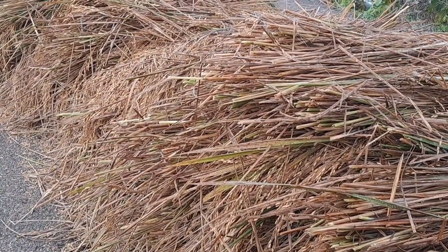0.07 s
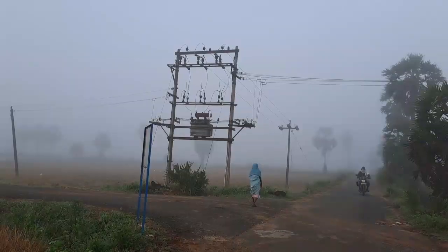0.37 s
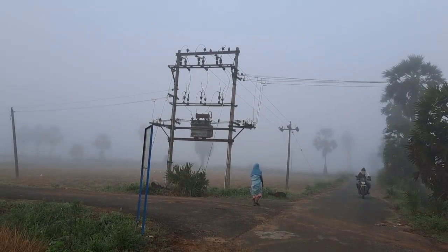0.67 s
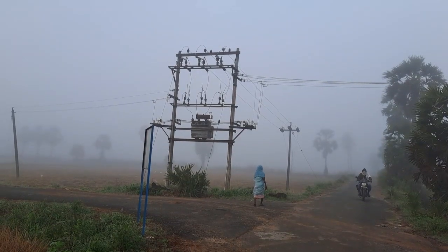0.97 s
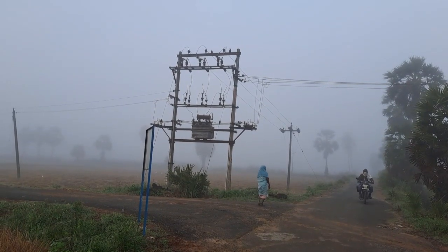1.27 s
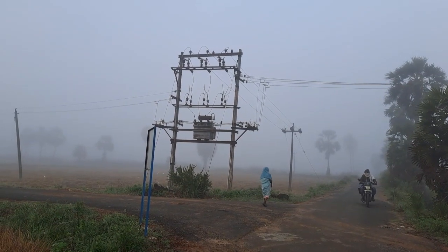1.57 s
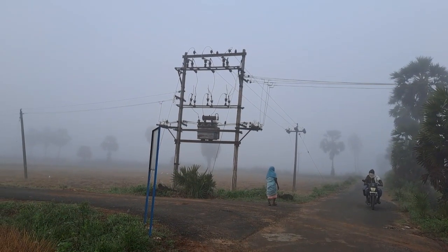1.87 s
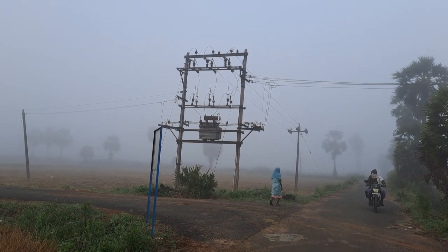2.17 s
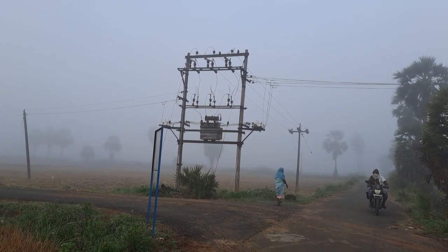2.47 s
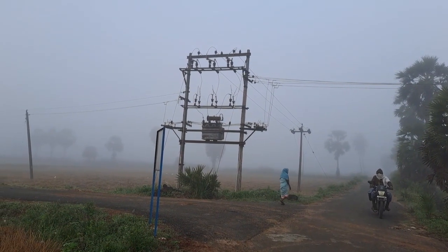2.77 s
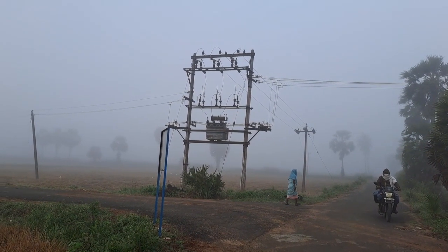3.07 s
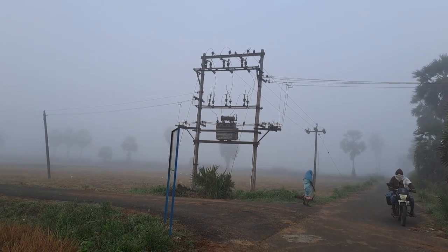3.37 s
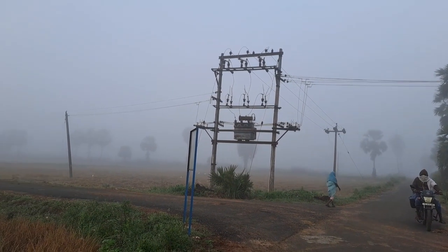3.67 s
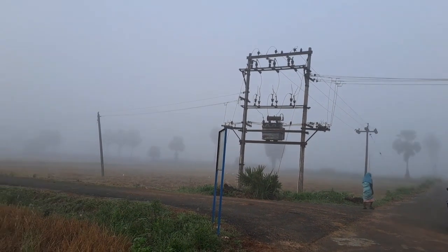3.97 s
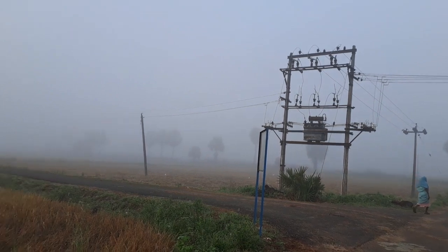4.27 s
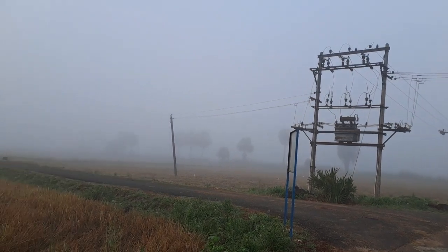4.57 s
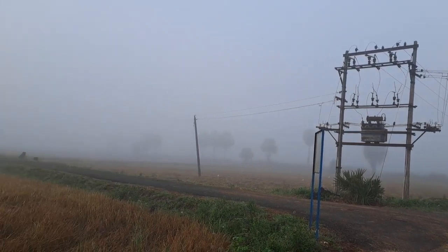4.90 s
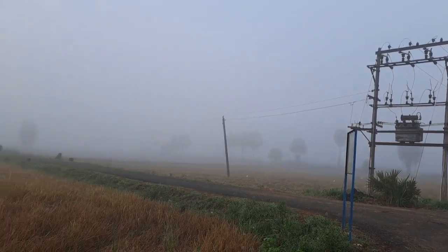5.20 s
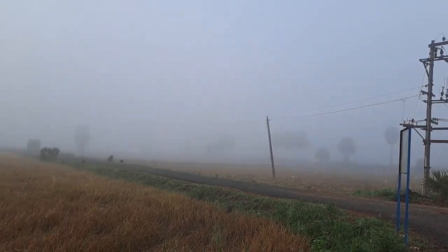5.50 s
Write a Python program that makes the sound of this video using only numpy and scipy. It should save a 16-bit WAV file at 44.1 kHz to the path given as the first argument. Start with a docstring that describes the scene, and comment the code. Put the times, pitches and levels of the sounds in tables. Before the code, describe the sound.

On a country roadside, low rumble and a throbbing motorbike run under piercing bird-like whistles, short notes first, then two long overlapping ones.

```python
"""Whistle on a foggy roadside

A loud, clear, bird-like whistle, perhaps a motorbike's brakes, steps between two registers in short
notes and ends in two long, overlapping ones. The bike throbs slowly nearer on the right, each thud
ringing its exhaust, over gusts of low rumble and the wash of the road. Small birds chirp and twitter
beside an insect-like buzz. A moment of field air and a short hush come first."""
import sys
import numpy as np
from scipy import signal
from scipy.io import wavfile
from scipy.ndimage import map_coordinates

SR = 44100
rng = np.random.default_rng(int(sys.argv[2]) if len(sys.argv) > 2 else 0)


def log_audio(samples):
    """Write samples as a 16-bit WAV file to the path given in sys.argv[1]."""
    # one column per channel
    frames = np.atleast_2d(samples).T
    # limit to full scale, then quantise
    limited = np.clip(frames, -1, 1)
    pcm = np.round(limited * 32767).astype(np.int16)
    wavfile.write(sys.argv[1], SR, pcm)


N = 244314
TIME = np.arange(N) / SR


# Short whistle notes: start_s, length_s, start_hz, end_hz, bow_hz, level_db
SHORT_NOTES = [(2.549, 0.063, 3552, 3640, 2.5, -46.5), (2.598, 0.083, 3570, 3637, -5, -37),
               (2.668, 0.077, 3680, 3645, 3, -32.5), (2.788, 0.0458, 4356, 4250, -4.5, -40),
               (2.829, .14, 3735, 3545, -19, -43), (2.874, 0.084, 4212, 4065, -23.5, -21.5),
               (2.97, 0.06, 4322, 4290, 91, -37.5), (3.055, 0.035, 4180, 4030, -1, -27),
               (3.128, 0.08, 3524, 3663, -28.5, -19), (3.217, 0.11, 4262, 4158, 69, -23.5),
               (3.338, 0.096, 4110, 4318, -43, -27), (3.444, 0.059, 3584, 3514, -27, -23),
               (3.496, 0.057, 4076, 4150, -18.5, -24)]
# The long low note sags in swells and recovers: time_s, pitch_hz, level_db
LONG_LOW_NOTE = [(3.598, 3480, -22), (3.64, 3487, -21.5), (3.68, 3417, -32.5), (3.77, 3367, -29),
                 (3.83, 3419, -25.5), (3.92, 3314, -34.5), (4.01, 3370, -34), (4.09, 3322, -34),
                 (4.18, 3343, -41), (4.24, 3350, -26.5), (4.3, 3297, -37), (4.36, 3434, -34.5),
                 (4.43, 3405, -30), (4.52, 3503, -23), (4.6, 3548, -43), (4.645, 3598, -33),
                 (4.71, 3631, -36), (4.82, 3615, -26), (4.91, 3601, -35)]
# The long high note steps and beats against its own echo: time_s, pitch_hz, level_db
LONG_HIGH_NOTE = [(4.552, 4147, -30.5), (4.575, 4097, -29.5), (4.675, 4128, -34), (4.69, 4260, -42),
                  (4.78, 4330, -38.5), (4.86, 4303, -37.5), (4.91, 4160, -30), (4.96, 4190, -28),
                  (5.052, 4055, -39), (5.075, 4078, -26), (5.175, 4124, -42.5), (5.19, 4187, -32.5),
                  (5.275, 4195, -38.5), (5.285, 4347, -38.5), (5.4, 4405, -52)]

def whistle_voices(rough, break_hz=3900, level_db=-2, tremble=0.00717, trill_hz=122, flutter_db=4):
    """Phase and strength of both registers; when forced, they trill fast and split into close strands."""
    low_notes = [arc(*note, fall_db=5) for note in SHORT_NOTES if note[2] < break_hz] + [LONG_LOW_NOTE]
    high_notes = [arc(*note, fall_db=5) for note in SHORT_NOTES if note[2] >= break_hz] + [LONG_HIGH_NOTE]
    low_phase, low = voice(low_notes, tremble * rough, attack_s=0.0053, release_s=0.011)
    high_phase, high = voice(high_notes, tremble * rough, attack_s=0.0046, release_s=0.007)
    trill = 1 + 0.76 * rough ** 2 * np.sin(wavering_phase(trill_hz, jitter=0.0669, rate=7.83))
    blur = 0.2 * rough ** 2 * uneven_cycles()
    low *= trill * from_db(level_db + flutter_db * np.sqrt(rough) * drift(30))
    high *= trill * from_db(level_db + flutter_db * np.sqrt(rough) * drift(30))
    return low_phase + blur, low, high_phase + blur, high


# The whistle's bright edge: harmonic, level_db, pan_db
OVERTONE_MIX = [(2, -22, 9), (3, -28, 3), (4, -35.5, 17.5)]

def overtones(low_phase, low, high_phase, high, rasp, boost_db, shimmer_db=4):
    """Shimmering harmonics of both voices; uneven cycles smear the higher ones most."""
    out = 0
    for harmonic, db, pan_db in OVERTONE_MIX:
        smear = rasp * harmonic * uneven_cycles()
        tone = low * np.sin(harmonic * low_phase + smear) + high * np.sin(harmonic * high_phase + smear)
        out += panned(from_db(db + boost_db + shimmer_db * drift(22.4)) * tone, pan_db)
    return out


# Sum and difference tones: low_multiple, high_multiple, level_db
COMBINATION_MIX = [(-1, 1, -23.5), (-1, 2, -27.5), (2, 1, -29.5)]

def combination_tones(low_phase, low, high_phase, high, rasp, flicker_db=2, peak_hz=520, width_hz=70):
    """Faint sum and difference tones sound where the voices overlap, strongest near 520 Hz."""
    tones = 0
    for low_multiple, high_multiple, db in COMBINATION_MIX:
        phase = low_multiple * low_phase + high_multiple * high_phase + rasp * uneven_cycles()
        tones += from_db(db + flicker_db * drift(13.4)) * np.sqrt(low * high) * np.sin(phase)
    emphasis = signal.iirpeak(peak_hz, peak_hz / width_hz, fs=SR)
    return tones + from_db(3) * signal.lfilter(*emphasis, tones + 1e-18)


# How hard the whistle is forced: time_s, roughness, overtone_boost_db
WHISTLE_STRAIN = [(2.55, 0.7, 3), (2.8, 0.39, -5.5), (2.9, 0.47, -1.5), (3.07, 0.54, -4.5),
                  (3.135, 0.28, 4.5), (3.23, 0.54, -4.5), (3.36, 0.58, -2), (3.63, 0.37, -4.5),
                  (3.78, 0.13, 0), (4.04, 0.64, 3.5), (4.12, 1, 4.5), (4.24, 0.09, 1), (4.305, 1.1, 5),
                  (4.42, 0.07, -3), (4.68, 0.46, -2.5), (4.83, 0.22, -3), (4.97, 0.45, -1.5),
                  (5.08, 0.29, -4.5), (5.27, 0.65, -7)]
# Where the whistle sits; engine and road share its lag: time_s, pan_db, left_ear_lag_s
POSITION = [(2.8, -6, 0.000091), (3.17, -3, 0.000076), (3.5, -8, 0.00014), (3.8, -7, 0.00013),
            (4.15, 1, 0.00021), (4.65, -4, 0.00022)]

def whistle():
    """Two voices sing over a soft rubbing noise that swells with them; ground and trees echo them."""
    rough, boost_db = in_time(WHISTLE_STRAIN)
    rasp = 0.47 * rough
    low_phase, low, high_phase, high = voices = whistle_voices(rough)
    tones = panned(low * np.sin(low_phase) + high * np.sin(high_phase), in_time(POSITION)[0])
    edge = overtones(*voices, rasp, boost_db)
    combined = combination_tones(*voices, rasp)
    rub = from_db(-51) * np.sqrt(np.hypot(low, high)) * hiss(830, 1754)
    near_echo = from_db(-3) * echoes(tones + combined, t60_s=0.2, predelay_s=0.0059)
    far_echo = from_db(-14) * echoes(tones, t60_s=0.87, predelay_s=0.027)
    edge_echo = from_db(-4) * echoes(edge, t60_s=0.25, predelay_s=0.003)
    return from_right(tones + edge + combined) + rub + near_echo + far_echo + edge_echo


# Engine speed: time_s, cycles_per_s
ENGINE_SPEED = [(0.0, 11.09), (1.0, 9.75), (2.0, 9.67), (3.0, 9.49), (4.0, 9.06), (5.0, 9.41), (5.54, 8.95)]
# The two thuds of a cycle: cycle_fraction, level_db, swing_db, ring_factor
THUDS = [(0.299, -2, 2, 1.97), (0.594, 3.5, -1, 0.96)]
# Exhaust resonances: pitch_hz, level_db, base_t60_s
EXHAUST_MODES = [(71.5, 13.5, 0.22), (133, -10, 0.14), (151.2, 13.5, 0.048), (192.8, 7, 0.1)]
# The bike draws near and the roadside swells with it: time_s, gain_db
APPROACH_SWELL = [(1.5, -3.5), (2.4, -2), (3, 1), (4.1, 0), (4.75, 2), (5.54, 0.2)]

def motorbike(level_db=-47, uneven_db=4):
    """Each slow engine cycle gives two thuds that ring the exhaust, swinging between weak and strong."""
    cycles = np.cumsum(in_time(ENGINE_SPEED)[0]) / SR
    exhaust = np.zeros(N)
    for fraction, stroke_db, swing_db, ring_factor in THUDS:
        hits = np.flatnonzero(np.diff(np.floor(cycles - fraction)) > 0)
        thud_db = stroke_db - swing_db * np.cos(np.pi * np.floor(cycles[hits]))
        for hz, db, t60_s in EXHAUST_MODES:
            kicks = np.zeros(N)
            kicks[hits] = from_db(thud_db + db + uneven_db * rng.standard_normal(len(hits)))
            decay = from_db(-60 / (ring_factor * t60_s * SR))
            angle = 2 * np.pi * hz / SR
            feedback = [1, -2 * decay * np.cos(angle), decay ** 2]
            exhaust += signal.lfilter([0, np.sin(angle)], feedback, kicks + 1e-18)
    throb = unit_rms(band(band(exhaust, 62, 198), 88.6, 185.7))
    return from_right(from_db(level_db + approach_db()) * throb)


# Far chirps and hoots, plus the whistle's thin top note and high squeak:
# start_s, length_s, start_hz, end_hz, bow_hz, level_db
THIN_NOTES = [(0.084, 0.097, 743, 790, -8, -40.5), (0.291, 0.035, 2578, 2040, -190, -54.5),
              (0.494, 0.027, 3280, 2790, 10, -57), (0.548, 0.038, 3040, 3400, 20, -44),
              (0.587, .045, 2800, 2164, -290, -52), (1.247, 0.38, 658, 587, 3, -60.5),
              (2.22, 0.24, 650, 625, -3, -57), (2.5, 0.107, 4550, 4500, 63, -59.5),
              (2.65, 0.07, 5660, 6050, 66, -59.5), (2.719, 0.18, 4960, 5090, 74, -42),
              (3.01, 0.068, 13600, 13400, -57, -42.5)]
# One down-and-up twitter: delay_s, start_hz, end_hz, level_db
TWITTER_FIGURE = [(0, 6600, 4250, -59), (.072, 4230, 6050, -57)]

def thin_calls(twitter_start_s=4.786, every_s=0.14, note_s=0.039, uneven_db=10, fall_db=16):
    """Far chirps, hoots, twitters and the whistle's top note and squeak: brief, echoing sine glides."""
    singles = [arc(*note, fall_db) for note in THIN_NOTES]
    twitters = []
    for start_s in twitter_start_s + every_s * np.arange(4):
        for delay_s, start_hz, end_hz, db in TWITTER_FIGURE:
            peak_db = db + uneven_db * rng.standard_normal()
            twitters.append(arc(start_s + delay_s, note_s, start_hz, end_hz, 0, peak_db, fall_db))
    calls = 0
    for notes in (singles, twitters):
        phase, strength = voice(notes, jitter=0.005, attack_s=0.003, release_s=0.0017)
        calls += panned(strength * np.sin(phase), pan_db=7)
    return from_db(-4) * calls + from_db(-10) * echoes(calls, t60_s=0.64, predelay_s=0.0036)


# Small dry ticks: start_s, level_db
TICK_HITS = [(2.393, -46), (3.636, -43), (4.496, -30)]

def ticks(gain_db=-6, t60_s=0.067):
    """Each tick is a burst of noise that dies at once."""
    envelope = sum((TIME >= s) * from_db(db - 60 * np.clip((TIME - s) / t60_s, 0, 2))
                   for s, db in TICK_HITS)
    return from_db(gain_db) * band(envelope * rng.standard_normal((2, N)), 1500, 4200)


def insect_buzz(level_db=-63.5, pulse_hz=104, depth=0.39):
    """A thin insect-like rasp on the left: a narrow band of hiss in quick pulses."""
    pulses = 1 + depth * np.cos(wavering_phase(pulse_hz, jitter=0.0322, rate=4.7))
    noise = band(rng.standard_normal(N) + 1.24 * rng.standard_normal((2, N)), 7050, 7800)
    return panned(from_db(level_db + approach_db()) * unit_rms(noise * pulses), pan_db=13)


def husky_call(peak_s=1.263, width_s=0.089, level_db=-64):
    """A very distant call, blurred to a swell of hiss with a thin, broken core."""
    breath = hiss(3200, 5200)
    core = from_db(-3 + 4 * drift(23)) * hiss(4830, 5030)
    swell = np.exp(-((TIME - peak_s) / width_s) ** 2 / 2)
    return from_db(level_db) * swell * (breath + core)


def bird_chatter(level_db=-73, pips_per_s=35, pip_s=0.067):
    """Many distant small birds pip at random and blend into a soft chatter."""
    starts = rng.random(N) < pips_per_s / SR
    power = signal.fftconvolve(starts * 1.0, np.hanning(int(pip_s * SR)) ** 2)[:N]
    return from_db(level_db) * np.sqrt(np.abs(power)) * hiss(4000, 5100)


# Colour of the low rumble: frequency_hz, density_db
RUMBLE_COLOUR = [(22, -33), (40, -6.5), (60, 9), (80, -6.5), (110, 1)]
# Gusts: peak_s, level_db
GUST_PEAKS = [(.38, -41), (2.759, -40), (3.25, -40), (4.397, -33), (5.289, -33.5)]

def gusty_rumble(level_db=-45, top_hz=100, rise_s=0.052, fall_s=0.14):
    """A deep bed of rumble, with gusts that buffet each ear on its own."""
    lowpass = signal.butter(6, top_hz, fs=SR, output="sos")
    deep = signal.sosfilt(lowpass, noise_bed(RUMBLE_COLOUR, flicker_db=-2))
    gusts = sum(from_db(db) * np.exp(np.minimum((TIME - s) / rise_s, (s - TIME) / fall_s))
                for s, db in GUST_PEAKS)
    return panned(from_db(level_db + approach_db()) * deep + gusts * hiss(31.3, 105), pan_db=1)


# Colour of the road: frequency_hz, density_db
ROAD_COLOUR = [(130, -4.5), (260, 8), (400, -6), (650, 2.5), (950, 0.5), (1400, -9), (2000, -26),
               (3000, -34)]

def road_wash(level_db=-56.5):
    """The road's restless midrange wash grows as the bike nears."""
    wash = from_db(level_db + approach_db()) * noise_bed(ROAD_COLOUR, flicker_db=3)
    return panned(from_right(wash), pan_db=1.5)


# Colour of the high air: frequency_hz, density_db
AIR_COLOUR = [(2200, -12.5), (3300, 15.5), (4500, 11.5), (5700, -1), (8300, -27.5), (9300, -6),
              (15000, -3.5)]

def country_air(level_db=-58.5, swell_factor=2.76):
    """High, airy hiss on the right that swells more steeply than the road."""
    air = from_db(level_db + swell_factor * approach_db()) * noise_bed(AIR_COLOUR, flicker_db=2.2)
    return panned(air, pan_db=-4.5)


# Colour of the opening field air: frequency_hz, density_db
FIELD_COLOUR = [(30, 4.5), (150, -0.5), (400, -12), (1300, -16.5), (1900, -29), (3100, -18), (4200, -69),
                (15000, -46)]

def field_air(level_db=-43.5, sizzle_db=-63):
    """A dull outdoor wash with a thin sizzle on top."""
    wash = from_db(level_db) * noise_bed(FIELD_COLOUR, flicker_db=1.5)
    return wash + from_db(sizzle_db) * hiss(6500, 8600)


# How alike the two ears hear the background: frequency_hz, correlation
EAR_LIKENESS = [(60, 0.44), (140, 1), (600, 0.7), (1200, 0.69), (2500, 0.034)]

def noise_bed(colour, flicker_db):
    """Half-octave bands of noise, each with its own level, flicker and stereo width; rms 1."""
    edges = 2 ** np.arange(np.log2(colour[0][0]), np.log2(colour[-1][0]) + .5, .5)
    out, white = 0, rng.standard_normal((2, 2, N))
    for k, (low, high) in enumerate(zip(edges, edges[1:])):
        mid, side = band(white[k % 2], low, high)
        centre_hz = np.sqrt(low * high)
        alike = at_hz(EAR_LIKENESS, centre_hz)
        gain = from_db(at_hz(colour, centre_hz) + flicker_db * drift(9.8))
        out += gain * (np.sqrt(1 + alike) * mid + np.sqrt(1 - alike) * side * [[1], [-1]])
    return unit_rms(out)


def echoes(x, t60_s, predelay_s):
    """Trees and ground return a spray of fading echoes, different at each ear."""
    t = TIME[:SR]
    spray = rng.standard_normal((2, SR)) * (rng.random((2, SR)) < .03)
    spray *= from_db(-60 * t / t60_s) * (t > predelay_s)
    spray /= np.sqrt(np.sum(spray ** 2, axis=1, keepdims=True))
    return signal.fftconvolve(x, spray, axes=1)[:, :N]


def arc(start_s, length_s, start_hz, end_hz, bow_hz, peak_db, fall_db, rise_db=6, peak_at=0.18):
    """A short note glides along a bow as it swells and fades; rows of time_s, pitch_hz, level_db."""
    progress = np.linspace(0, 1, 21)
    hz = start_hz + (end_hz - start_hz) * progress + bow_hz * np.sin(np.pi * progress)
    db = peak_db - np.interp(progress, [0, peak_at, 1], [rise_db, 0, fall_db])
    return np.column_stack([start_s + length_s * progress, hz, db])


def voice(notes, jitter, attack_s, release_s):
    """Phase and strength of one whistling voice; its pitch trembles."""
    hz = in_time([row for note in notes for row in note])[0]
    strength = np.zeros(N)
    for note in notes:
        attack = np.clip(1 + (TIME - note[0][0]) / attack_s, 0, 1)
        release = np.clip(1 - (TIME - note[-1][0]) / release_s, 0, 1)
        strength = np.maximum(strength, attack * release * from_db(in_time(note)[1]))
    return wavering_phase(hz, jitter, rate=80.3), np.sqrt(2) * strength


def wavering_phase(hz, jitter, rate):
    """Phase of an oscillation whose frequency wanders."""
    return 2 * np.pi * np.cumsum(hz * (1 + jitter * drift(rate))) / SR


def uneven_cycles():
    """Quick random wobble in the whistle's cycles; spread 1."""
    return unit_rms(band(rng.standard_normal(N), 25, 210))


def drift(rate):
    """Smooth random wander; spread 1."""
    pole = np.exp(-40 * np.pi * rate / SR)
    slow = signal.lfilter([1], [1, -2 * pole, pole * pole], rng.standard_normal(N // 20 + 2002))[2000:]
    return np.interp(np.arange(N) / 20, np.arange(len(slow)), unit_rms(slow))


def approach_db():
    """The swell as the bike draws near."""
    return in_time(APPROACH_SWELL)[0]


def from_right(x):
    """The sound reaches the right ear first."""
    left, right = x * np.ones((2, 1))
    lag_s = in_time(POSITION)[1]
    return np.array([map_coordinates(left, [np.arange(N) - lag_s * SR], order=3), right])


def panned(x, pan_db):
    """Place a sound by level difference; positive is left."""
    gains = np.array([from_db(pan_db / 2), from_db(-pan_db / 2)]).reshape(2, -1)
    return x * gains / gains.mean(axis=0)


def hiss(low_hz, high_hz):
    """A steep-edged band of stereo noise; rms 1."""
    return unit_rms(band(band(rng.standard_normal((2, N)), low_hz, high_hz), low_hz, high_hz))


def band(x, low_hz, high_hz):
    """Butterworth band-pass."""
    return signal.sosfilt(signal.butter(2, [low_hz, high_hz], "band", fs=SR, output="sos"), x)


def in_time(rows):
    """Each column of a curve at every sample."""
    times, *columns = np.transpose(rows)
    return [np.interp(TIME, times, column) for column in columns]


def at_hz(rows, hz):
    """Read a curve on a log-frequency axis."""
    frequencies, values = np.transpose(rows)
    return np.interp(np.log(hz), np.log(frequencies), values)


def from_db(db):
    """Decibels to gain."""
    return 10 ** (np.asarray(db) / 20)


def unit_rms(x):
    """Scale to rms 1."""
    return x / np.sqrt(np.mean(x ** 2) + 1e-20)


def scene(hush_start_s=0.2197, hush_end_s=0.29):
    """The field air stops short; after a hush the roadside begins. Thin calls sound in both."""
    fade_out = np.clip((hush_start_s - TIME) / 0.011 + 1, 0, 1)
    fade_in = np.clip((TIME - hush_end_s) / 0.0012 + 1, from_db(-33), 1)
    opening = field_air()
    background = gusty_rumble() + road_wash() + country_air()
    roadside = background + motorbike() + insect_buzz() + ticks() + husky_call() + bird_chatter()
    roadside += whistle()
    return fade_out * opening + fade_in * roadside + np.maximum(fade_out, fade_in) * thin_calls()


def record(dry, cutoff_hz=15550):
    """The highest treble is cut steeply."""
    return signal.sosfilt(signal.ellip(12, .1, 80, cutoff_hz, fs=SR, output="sos"), dry)


dry = scene()
out = record(dry)
log_audio(out)
```